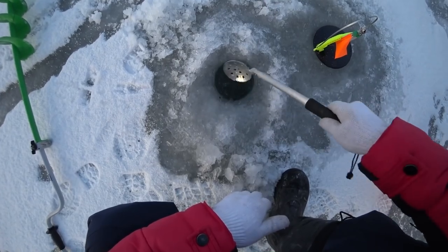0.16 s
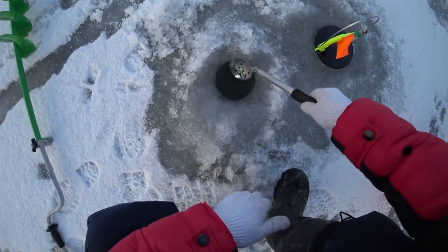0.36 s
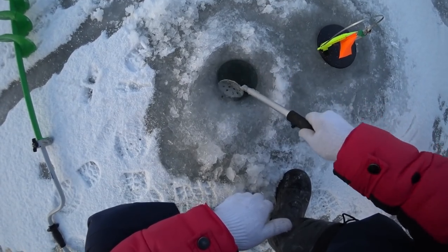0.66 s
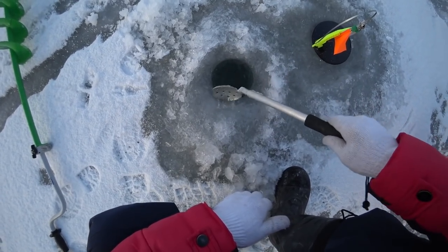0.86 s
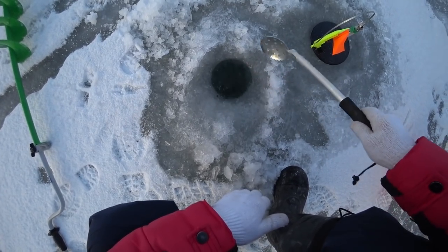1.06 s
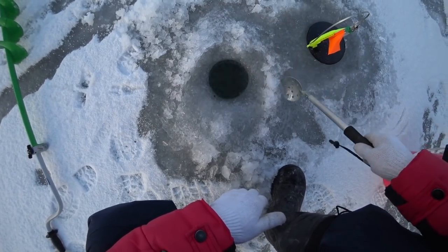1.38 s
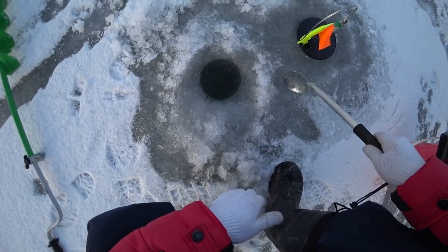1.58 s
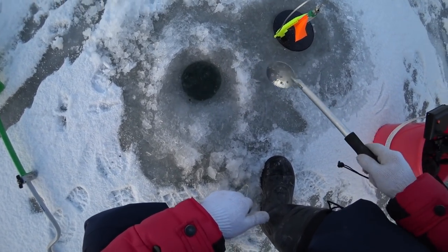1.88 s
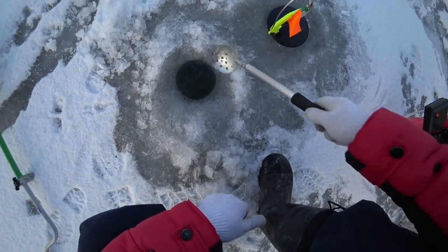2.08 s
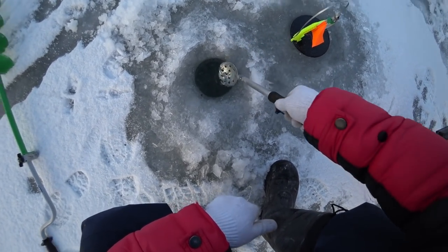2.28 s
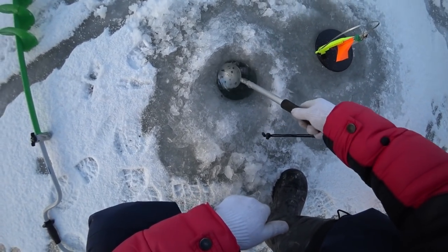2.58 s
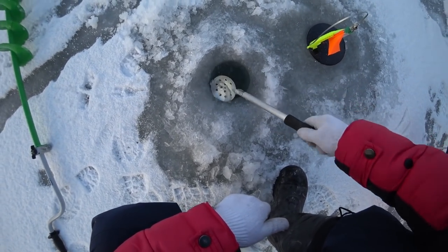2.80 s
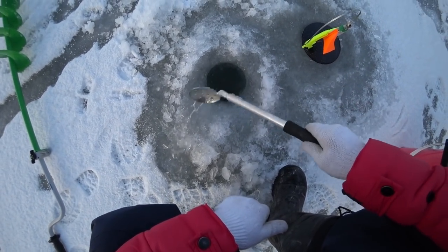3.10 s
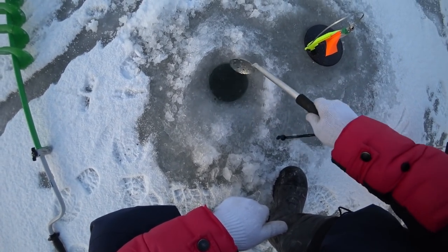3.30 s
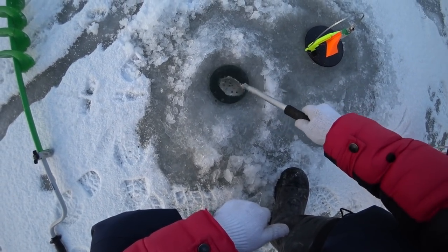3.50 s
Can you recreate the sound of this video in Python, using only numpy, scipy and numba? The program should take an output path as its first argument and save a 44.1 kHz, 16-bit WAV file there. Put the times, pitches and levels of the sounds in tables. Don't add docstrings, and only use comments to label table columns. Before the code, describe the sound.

A metal skimmer scoops icy slush outdoors, heard from the chest. A spray and sharp crack come by 0.2 s, chips crackle until 0.9, densest near 0.75. After a lull, the bowl raps the ice at 1.36, with a short spray at 1.5. Boots creak dully at 1.8-2.1. Lighter scooping and rising bubbles follow, then bright splinters and spray around 3.2, fading crackles to 3.6. Sleeve rustles over faint low hum.

```python
import sys
import numpy as np
from scipy import signal
from scipy.fft import rfft, irfft
from scipy.io import wavfile
from scipy.ndimage import uniform_filter1d
from numba import njit

SR = 44100
rng = np.random.default_rng(int(sys.argv[2]) if len(sys.argv) > 2 else 0)


def master_out(mix):
    frames = np.transpose(np.atleast_2d(mix))
    ceiling = np.clip(frames, -1, 1)
    pcm = np.round(ceiling * 32767).astype(np.int16)
    wavfile.write(sys.argv[1], SR, pcm)


def decibels_to_gain(level_db):
    exponent = np.asarray(level_db, float) / 20
    return 10 ** exponent


N = 160965
T = np.arange(N) / SR
LEFT_RIGHT = np.array([[1], [-1]])


def unit(x):
    return x / np.sqrt(np.mean(x ** 2) + 1e-18)


def colour(x, points):
    hz, db = np.array(points, float).T
    f = np.maximum(np.arange(N // 2 + 1) * SR / N, 1)
    return irfft(rfft(x) * decibels_to_gain(np.interp(np.log(f), np.log(hz), db)), N)


def butter(x, order, hz, kind):
    return signal.sosfilt(signal.butter(order, hz, kind, fs=SR, output="sos"), x)


def walk(rate):
    hold = int(SR / rate)
    steps = np.repeat(rng.standard_normal(N // hold + 1), hold)
    return unit(uniform_filter1d(uniform_filter1d(steps, hold), hold)[:N])


def samples(seconds):
    return (seconds * SR).astype(np.int64)


@njit
def grains(length, start, hz, cycles, size):
    out = np.zeros(length)
    for k in range(len(hz)):
        turn = np.exp((2j * np.pi - 1 / cycles[k]) * hz[k] / SR)
        z = size[k] + 0j
        for i in range(start[k], min(length, start[k] + int(5 * cycles[k] * SR / hz[k]))):
            out[i] += z.imag
            z *= turn
    return out


def shards(seconds, hz, octaves, count):
    when, rarity, damping = rng.random((count, 3)).T
    f = np.clip(hz * 2 ** (octaves * rng.standard_normal(count)), 200, 17000)
    size = decibels_to_gain(-2.8 * np.log(rarity + 0.0025)) * (f / hz) ** .5
    cycles = 3.14 * (1.14 + 3.9 * damping)
    return unit(grains(int(seconds * SR), samples(when * seconds), f, cycles, size))


# pitch in Hz, level in dB, 60 dB decay time in seconds.
BOWL_MODES = [(2848, -20, .03), (4350, -12, .022), (7241, -12, .021), (9135, -22, .04), (6440, -14, .075),
              (6508, -13.5, .085)]
SLUSH_T60_S = .03


def bowl(push, longest_s):
    out = 0
    for hz, db, t60 in BOWL_MODES:
        r = np.exp(-np.log(1000) / (min(t60, longest_s) * SR))
        w = 2 * np.pi * hz / SR
        out = out + decibels_to_gain(db) * signal.lfilter([0, r * np.sin(w)], [1, -2 * r * np.cos(w), r * r], push)
    return out


# frequency in Hz, level in dB per Hz.
AIR_SPECTRUM = [(20, -12), (87, 4.5), (115, -10), (280, -4), (2000, -46)]
# frequency in Hz, left minus right in dB.
AIR_LEAN = [(60, 0), (300, 7), (1500, 47)]


def air():
    mid, side = (unit(colour(rng.standard_normal(N), AIR_SPECTRUM)) for _ in range(2))
    ports = []
    for sign in (1, -1):
        lean = [(hz, sign * db / 2) for hz, db in AIR_LEAN]
        ports.append(colour(mid + sign * decibels_to_gain(-22) * side, lean))
    return decibels_to_gain(-53 + 1.0 * walk(5.94)) * np.array(ports)


# time in seconds, sleeve rustle in dB, left minus right in dB.
ARM_PATH = [(0, -44.5, -0.5), (.62, -54, -3), (.95, -46.5, -3), (1.4, -56.5, -6), (1.7, -46, -3),
            (2.0, -49, -6), (2.3, -52, -3.5), (2.8, -48, -3.5), (3.07, -62, 0), (3.42, -46, -3),
            (3.6, -54, -2)]
# frequency in Hz, level in dB per Hz.
CLOTH_SPECTRUM = [(300, -5.5), (1200, -8), (2600, -13), (7000, -14.5), (11000, -21.5), (16000, -36)]


def cloth(kind):
    return butter(unit(colour(rng.standard_normal((2, N)), CLOTH_SPECTRUM)), 2, 1340, kind)


def sleeve():
    time, rustle_db, _ = np.array(ARM_PATH).T
    level = np.interp(T, time, rustle_db)
    dull, bright = cloth("low"), cloth("high")
    dull = dull * decibels_to_gain(np.array([[0], [-6.0]]))
    dull_gain = decibels_to_gain(level + 0.5 * walk(12))
    bright_gain = decibels_to_gain(0.78 * (level + 50) - 49.0 + 0.5 * walk(9.84) + 1.43 * walk(65))
    mid, side = dull_gain * dull + bright_gain * bright
    return mid + decibels_to_gain(-8.5) * side * LEFT_RIGHT


# start, loudest and end in seconds, level in dB, centre in Hz.
SLUSH_SPRAYS = [(.0, 0.168, 0.29, -31, 5850), (0.243, 0.36, 0.47, -39.5, 1825),
                (0.688, 0.74, 0.8, -37, 3000), (1.39, 1.445, 1.51, -34, 7500),
                (1.44, 1.503, 1.514, -27.5, 4600), (1.45, 1.498, 1.513, -32, 9000),
                (1.96, 2.13, 2.25, -42, 4500), (2.17, 2.24, 2.25, -36, 1700),
                (2.72, 2.937, 3.01, -36.5, 5280), (2.999, 3.084, 3.106, -33.5, 6650),
                (3.078, 3.123, 3.17, -43.5, 5940), (3.155, 3.195, 3.24, -25.5, 6000),
                (3.194, 3.257, 3.4, -36.5, 6910), (3.42, 3.536, 3.65, -39.5, 7830)]


def sprays():
    out = np.zeros(N)
    clumps = decibels_to_gain(2.0 * walk(220))
    for start, top, end, db, hz in SLUSH_SPRAYS:
        times = [start - .01, start, top, end, end + 0.0074]
        swell_db = np.interp(T, times, [-50, -14, 0, -14, -50], -200, -200)
        patter = np.resize(shards(.5, hz, octaves=.75, count=9000), N)
        out += decibels_to_gain(db + swell_db) * clumps * butter(patter, 3, 0.35 * hz, "high")
    return out + decibels_to_gain(-69) * bowl(out, SLUSH_T60_S)


# start in seconds, level in dB, chip pitch in Hz, length in seconds.
FIRST_CHIPS = [(0.025, -38, 7700, 0.012), (0.116, -34, 7500, 0.008), (0.1522, -21, 5000, 0.007),
               (0.193, -30.5, 10200, 0.0052), (0.375, -42.5, 3250, 0.011), (0.391, -28, 9000, 0.012),
               (0.41, -35, 8000, 0.0082), (0.432, -38, 8800, 0.014), (0.4505, -25, 8500, 0.004),
               (.461, -31, 7800, .006), (0.474, -33, 6500, 0.004), (0.4822, -21.5, 8000, 0.0055),
               (0.501, -39.5, 8440, 0.023), (0.54, -36.5, 3730, 0.0052), (0.5706, -35.5, 4460, 0.0039),
               (0.58, -40, 3750, 0.0053), (0.613, -36, 2470, 0.0084), (0.646, -33, 5070, 0.011),
               (0.672, -38, 2260, 0.004), (0.7035, -31.5, 4070, 0.01), (0.718, -32, 2470, 0.019),
               (0.735, -26, 3850, 0.0045), (0.741, -32.5, 4660, 0.014), (0.757, -24.5, 3900, 0.0076),
               (0.782, -26, 8360, 0.019), (0.82, -31, 7500, 0.014), (0.831, -26.5, 4370, 0.0091),
               (0.843, -27.5, 6800, 0.0064), (0.857, -30.5, 9670, 0.017)]
MIDDLE_CHIPS = [(1.266, -36.5, 4250, 0.0023), (1.433, -32, 9100, 0.006), (1.4525, -30, 4500, 0.002),
                (1.808, -33.5, 3960, 0.0027), (1.86, -40.5, 2350, 0.0042), (1.88, -43, 1230, 0.006),
                (1.907, -33, 2170, 0.0058), (2.148, -43, 3600, 0.035), (2.1, -41, 3400, 0.04),
                (2.073, -40, 1330, 0.004), (2.32, -39, 9100, 0.0067), (2.333, -40.5, 8500, 0.011),
                (2.35, -38, 7840, 0.029), (2.374, -33, 2300, 0.008), (2.395, -29.5, 2000, 0.0034),
                (2.456, -33, 5800, 0.0031), (2.532, -41, 4350, 0.0098), (2.609, -35.5, 8150, 0.0023),
                (2.6226, -40, 3530, 0.0029)]
LAST_CHIPS = [(2.71, -39, 2600, 0.0063), (2.7247, -35, 2530, 0.0032), (2.7428, -41, 3520, 0.024),
              (2.758, -36.5, 4700, 0.018), (2.7743, -32, 2600, 0.0083), (2.815, -39.5, 3960, 0.016),
              (2.8377, -32, 5230, 0.0024), (2.875, -28, 7860, 0.013), (2.9016, -35, 6100, 0.0077),
              (2.9162, -30, 5800, 0.0052), (2.9247, -25.5, 7000, 0.0044), (2.9435, -26, 4180, 0.0035),
              (2.9927, -35, 8250, 0.0043), (3.066, -36.5, 4300, 0.0048), (3.1155, -29, 6800, 0.0037),
              (3.1263, -37, 4320, 0.0029), (3.1502, -31, 10100, 0.0041), (3.4137, -26, 8660, 0.014),
              (3.445, -42, 9000, 0.0035), (3.4658, -41.5, 9000, 0.011), (3.5, -39, 5000, 0.0033),
              (3.516, -40, 9455, 0.0046), (3.5278, -36.5, 9600, 0.0098), (3.5458, -43, 5800, 0.01),
              (3.5547, -30, 5730, 0.0018), (3.56, -29, 5740, 0.0028), (3.572, -39, 5000, 0.004),
              (3.6079, -45.5, 3150, 0.0041), (3.62, -42, 5900, 0.0025)]


def chips():
    t = T[:2205]
    out = np.zeros(N + len(t))
    for start, db, hz, length in FIRST_CHIPS + MIDDLE_CHIPS + LAST_CHIPS:
        rise_s = 0.00023 + 0.078 * length
        env = (1 - np.exp(-t / rise_s)) * np.exp(-(t / length) ** 2)
        debris = shards(.05, np.sqrt(hz * 4730), octaves=1, count=1200)
        tone = shards(.05, hz, octaves=0.028, count=60)
        crunch = env * (debris + tone)
        i = int(start * SR)
        out[i:i + len(t)] += decibels_to_gain(db) * crunch / np.sqrt(np.sum(crunch ** 2) / (length * SR))
    out = out[:N]
    return out + decibels_to_gain(-35.5) * bowl(out, SLUSH_T60_S)


# start in seconds, first and last pitch in Hz, length in seconds, peak in dB.
AIR_BUBBLES = [(0.0685, 1850, 3500, 0.013, -29), (0.154, 848, 1030, 0.0072, -19.5),
               (0.679, 740, 1150, 0.024, -35), (2.609, 391, 857, 0.074, -33), (2.71, 600, 650, .008, -40),
               (2.726, 580, 700, .014, -39), (2.722, 1250, 1260, .045, -41), (2.745, 700, 850, .02, -42),
               (2.792, 888, 1334, 0.026, -33), (3.4143, 1940, 2100, 0.006, -23),
               (3.621, 3050, 3180, 0.031, -40.5)]


def bubbles():
    out = np.zeros(N)
    for start, first_hz, last_hz, length, db in AIR_BUBBLES:
        u = np.clip((T - start) / length, 0, 1.5)
        hz = first_hz * (last_hz / first_hz) ** (u ** 1.2)
        rise = np.minimum(u * length / 0.0014, 1)
        fade = np.exp(-1.7 * u ** 1.8) * (u < 1.5)
        out += decibels_to_gain(db) * rise * fade * np.sin(2 * np.pi * np.cumsum(hz) / SR)
    return out * decibels_to_gain(2 * walk(120))


# start in seconds, peak in dB, pitch in Hz.
SPLINTERS = [(.1528, -9, 4400), (.6795, -27, 1900), (.6838, -27, 2090), (.7125, -29, 1930),
             (.7195, -23, 2060), (.7307, -24.5, 1690), (0.735, -23, 1870), (0.7552, -17, 2400),
             (0.7908, -22.5, 2530), (.796, -18, 7400), (1.0466, -39, 9500), (1.115, -37, 10700),
             (1.3576, -22, 6700), (1.3598, -8, 4300), (1.3877, -36, 4500), (1.4134, -37, 7400),
             (2.3693, -32, 2500), (2.406, -30, 12000), (2.413, -29, 5200), (2.42, -42, 3120),
             (2.462, -37, 11700), (2.512, -39, 2200), (2.565, -49, 9000), (2.606, -41, 6540),
             (2.7265, -32.5, 2030), (2.792, -31, 1900), (2.88, -21, 2240), (3.0625, -22, 12500),
             (3.0723, -17, 6600), (3.077, -27.5, 2560), (3.089, -29, 8000), (3.1, -23, 8360),
             (3.169, -28, 3180), (3.177, -16.5, 2980), (3.186, -16.5, 4200), (3.1905, -17, 7300),
             (3.1948, -10.5, 9700), (3.203, -12, 10200), (3.2107, -16.5, 2680), (3.215, -17.5, 4700),
             (3.225, -27, 9800), (3.241, -23, 10500), (3.2566, -23, 5460), (3.271, -26, 4740),
             (3.282, -25, 11000), (3.295, -29, 6000), (3.373, -29, 8500), (3.435, -28, 2280)]


def snaps():
    start, db, hz = np.array(SPLINTERS).T
    out = grains(N, samples(start), hz, np.full(len(start), 3.7), decibels_to_gain(db))
    for pitch, delay in rng.random((len(start), 4, 2)).transpose(1, 2, 0):
        bit_hz = np.clip(hz * 2 ** (1.63 * pitch - .6), 200, 15500)
        bit_start = samples(start + .0015 * delay)
        out += grains(N, bit_start, bit_hz, np.full(len(start), 2.5), decibels_to_gain(db - 9))
    return out


def knock():
    knock_s = 1.361
    u = np.maximum(T - knock_s + .002, 0)
    fragments = np.resize(shards(.05, 4960.0, octaves=0.58, count=900), N)
    crack = (u > 0) * np.exp(-u / 0.005) * fragments
    rap = grains(N, np.array([int(knock_s * SR)]), np.array([5500.]), np.array([.8]), np.ones(1))
    return decibels_to_gain(-19) * crack + decibels_to_gain(-21) * bowl(rap, 1.)


# start in seconds, peak in dB.
BOOT_CREAKS = [
    (1.808, -24.5),
    (1.882, -25.5),
    (1.912, -20.5),
    (1.955, -27.5),
    (2.042, -25),
    (2.073, -27.5),
    (2.299, -35),
]


def creaks():
    start, db = np.array(BOOT_CREAKS).T

    def mode(hz, cycles):
        pitch = hz * 2 ** (0.23 * rng.standard_normal(len(start)))
        return grains(N, samples(start), pitch, np.full(len(start), cycles), decibels_to_gain(db))

    return 0.69 * mode(640.0, 0.73) + 0.61 * mode(1130.0, 1.65)


def scene():
    time, _, lean_db = np.array(ARM_PATH).T
    ice = butter(chips() + snaps() + sprays() + knock(), 3, 800, "high")
    pan = decibels_to_gain(np.interp(T, time, lean_db) / 2 * LEFT_RIGHT)
    echoes = np.roll(ice, 310) - np.roll(ice, 590)
    late = decibels_to_gain(-22.5) * colour(echoes, [(2000, -6.0), (8000, 4.5)])
    low = (bubbles() + creaks()) * decibels_to_gain(1.5 * LEFT_RIGHT)
    return (ice + sleeve()) * pan + late * LEFT_RIGHT + low + air()


def low_pass(x):
    return signal.sosfilt(signal.butter(12, 16820, fs=SR, output="sos"), x)


def record(dry):
    soft = butter(dry, 2, 14000, "low")
    steep = signal.ellip(8, .3, 45, 15900, fs=SR, output="sos")
    return low_pass(signal.sosfilt(steep, soft))


dry = scene()
out = record(dry)
master_out(out)
```